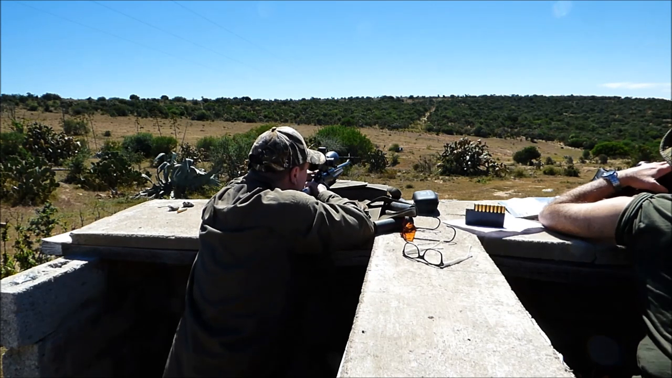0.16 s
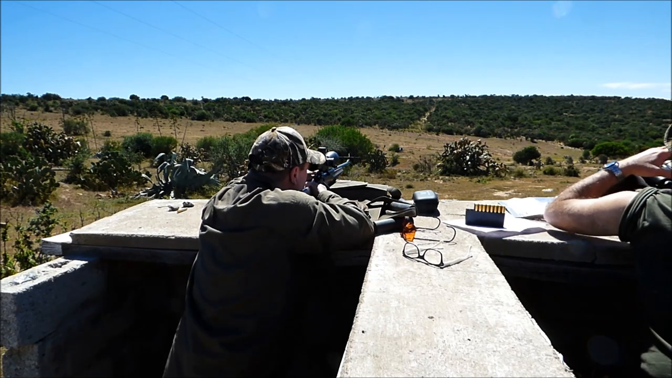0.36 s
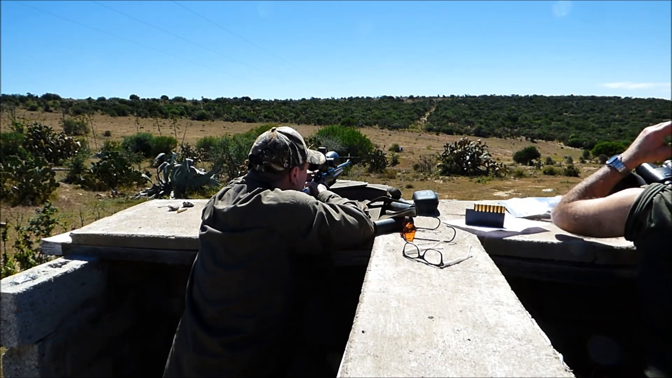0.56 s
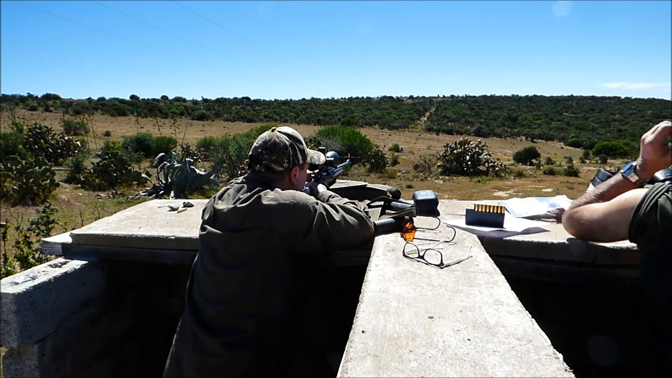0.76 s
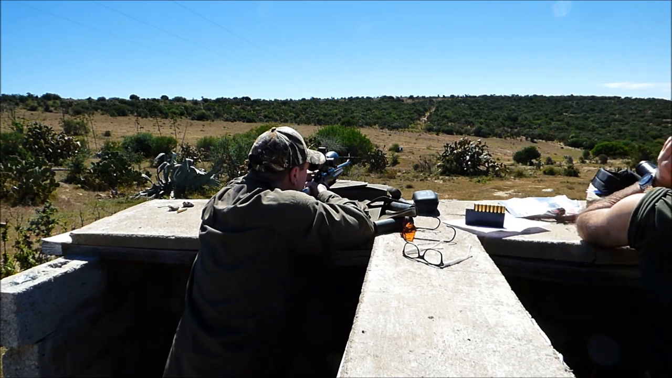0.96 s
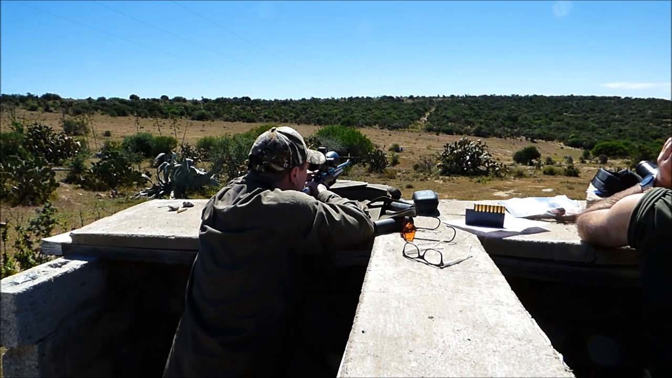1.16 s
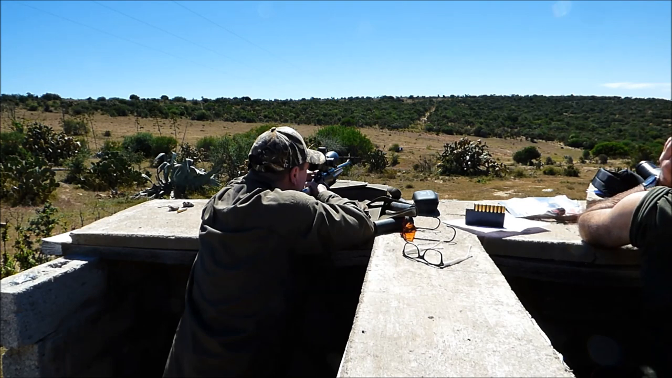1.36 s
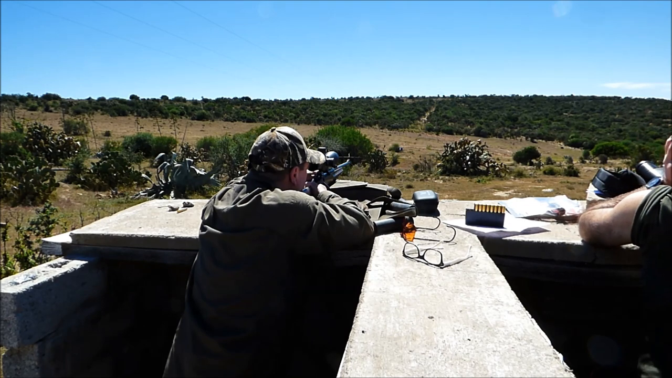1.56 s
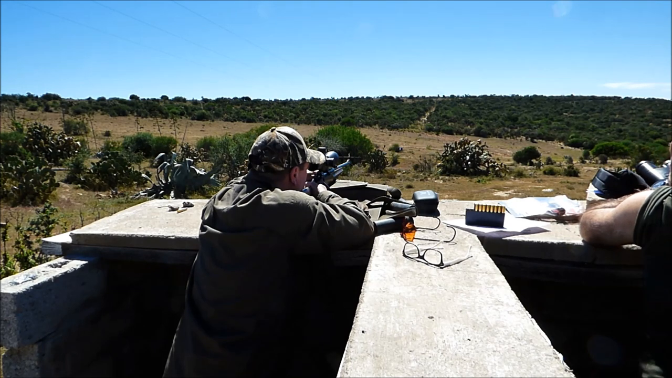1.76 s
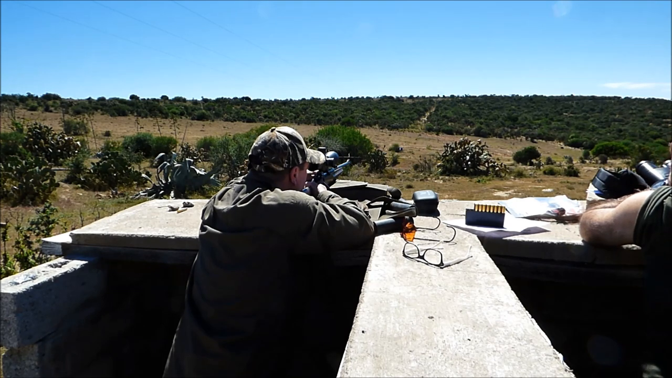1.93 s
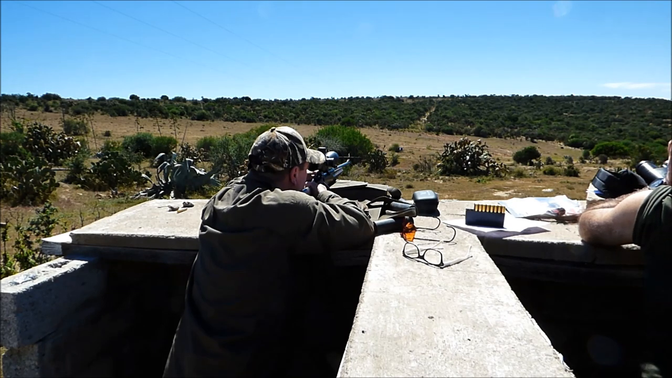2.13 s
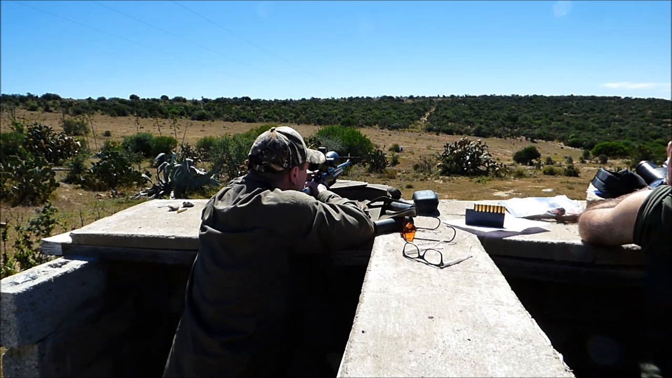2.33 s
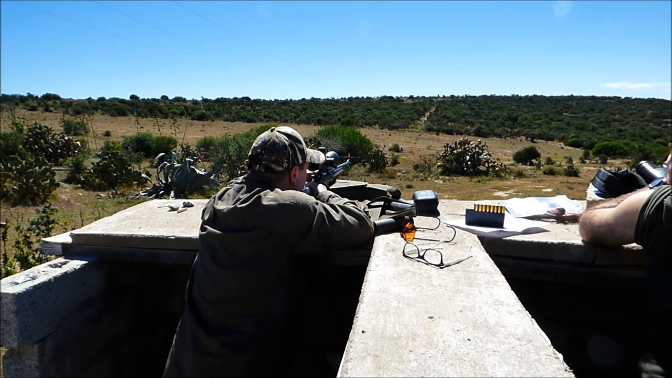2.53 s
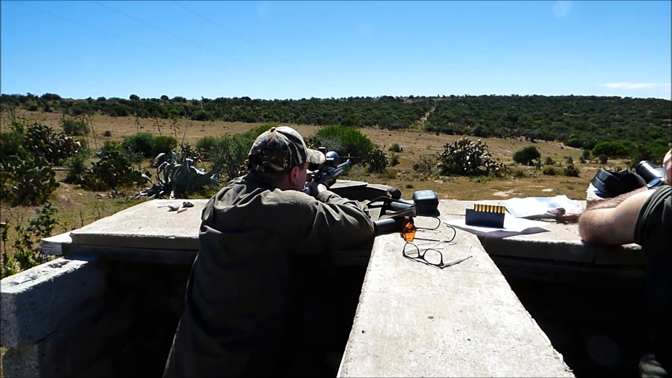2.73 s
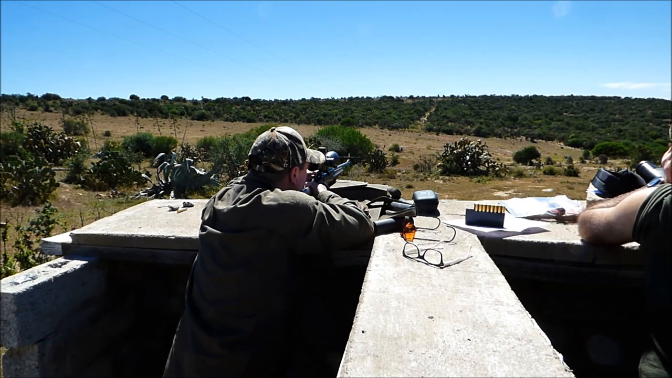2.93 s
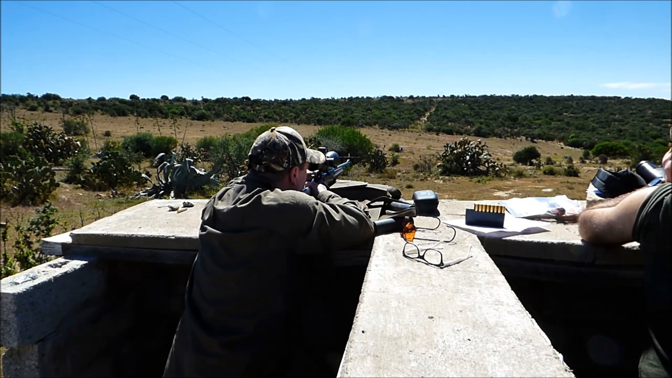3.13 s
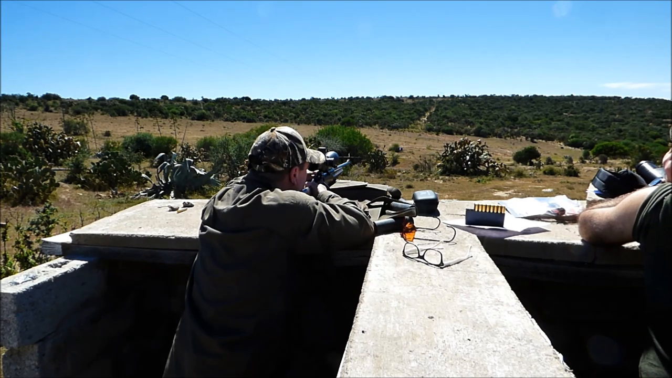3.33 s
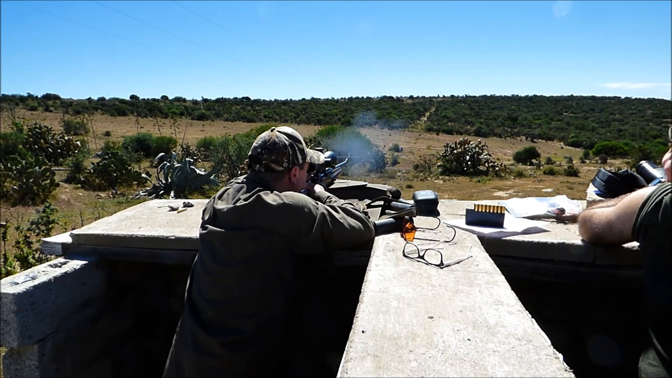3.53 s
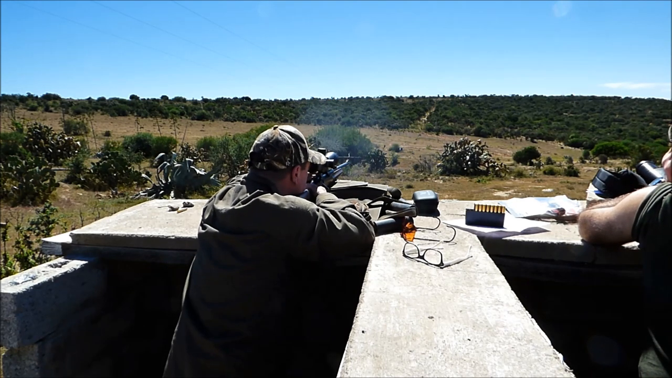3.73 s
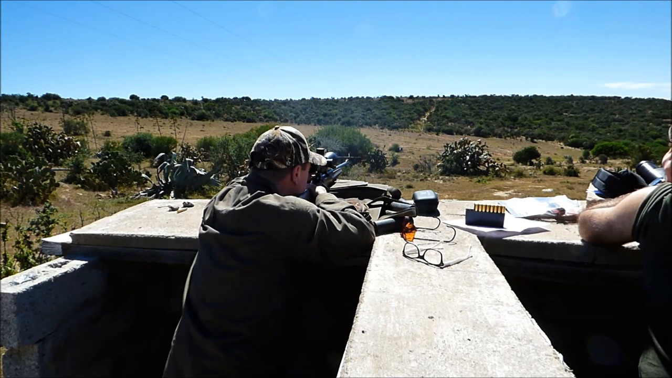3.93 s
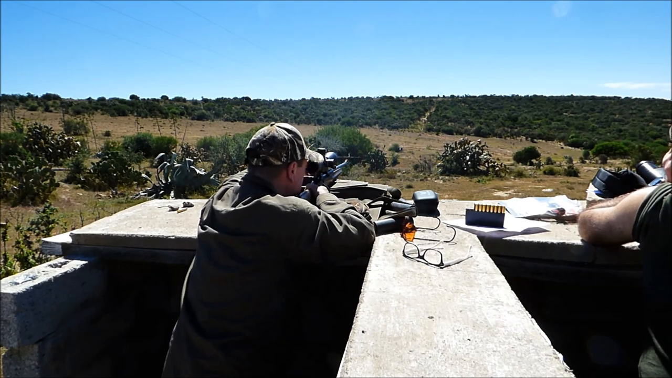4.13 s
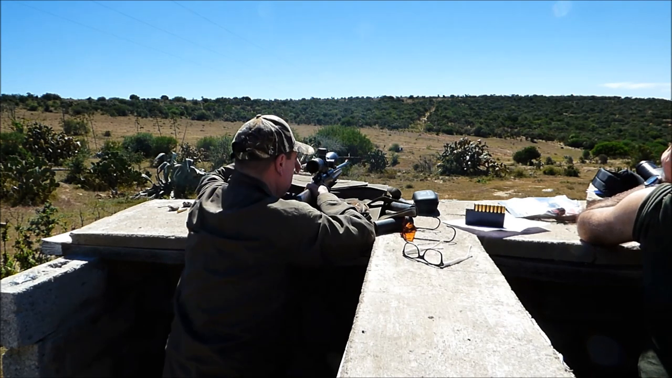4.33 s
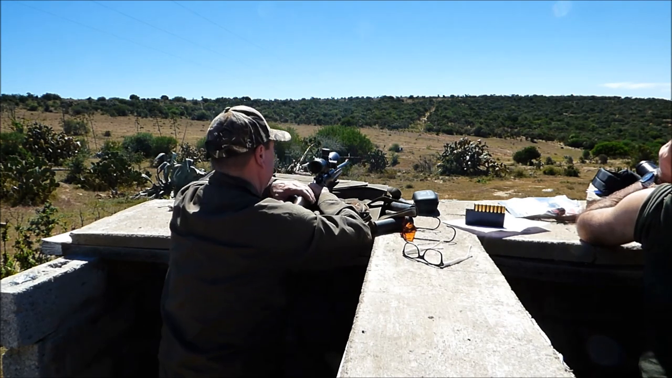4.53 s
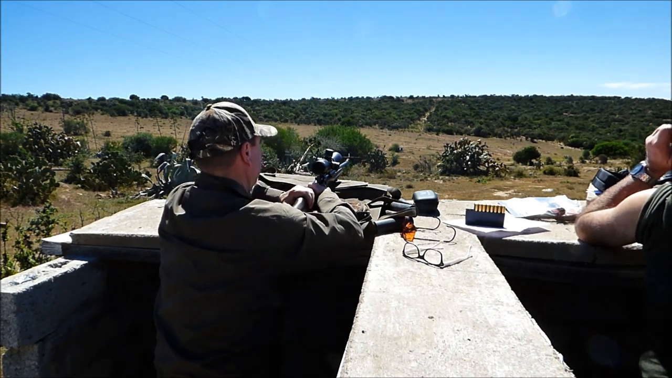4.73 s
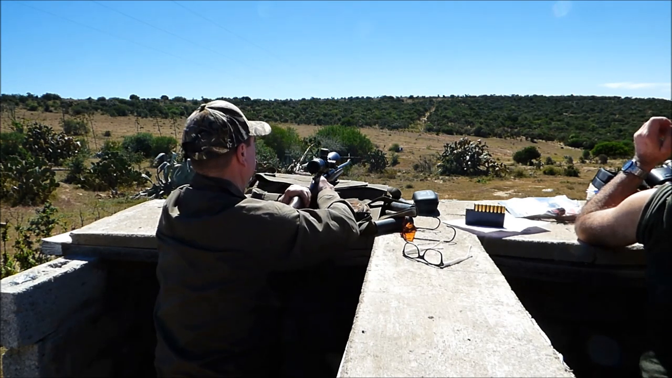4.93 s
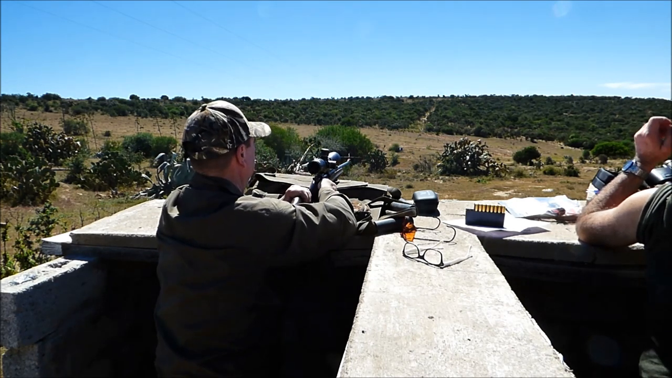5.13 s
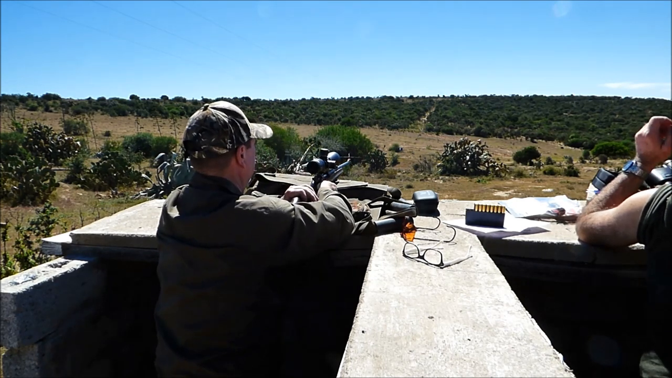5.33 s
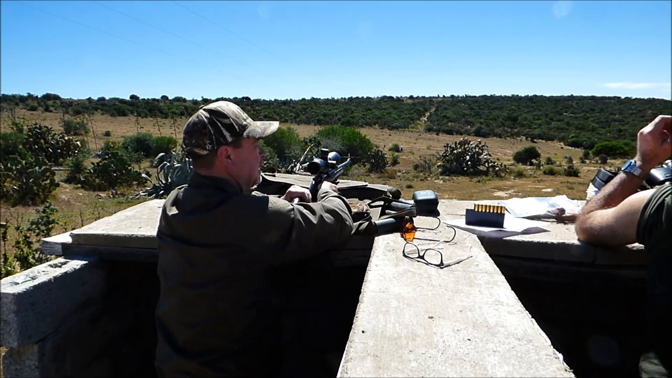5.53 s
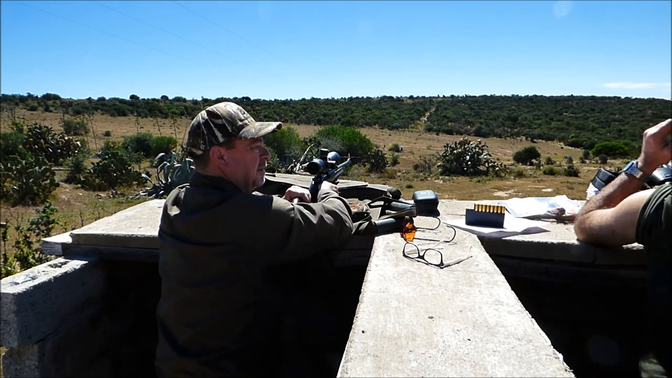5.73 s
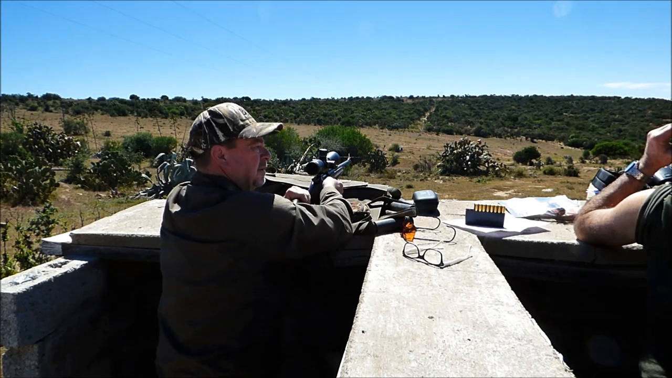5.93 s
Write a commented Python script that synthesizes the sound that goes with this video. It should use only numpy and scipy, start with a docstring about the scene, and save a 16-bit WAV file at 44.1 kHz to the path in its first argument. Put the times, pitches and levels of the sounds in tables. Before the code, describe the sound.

Quiet windy bushland with a brief bird whistle, then one overloaded rifle crack, rolling echoes, a slammed bolt and a ringing brass case.

```python
"""One rifle shot from a concrete bench on an open range, built from shaped noise that rasps and booms.
It rolls back from bush and ridge as thousands of tiny copies, with distinct slaps and a late hollow ring.
The bolt is lifted and slammed open: damped steel modes and a sliding hiss; the brass case flies out ringing
like a small bell and bounces. Around it lie noise-made wind, still air, brushes, grass hiss, a faint putter
and a grasshopper's pulsed rasp, with a bird's sine whistles and twitter and a distant bird's peeps."""
import sys
import numpy as np
from scipy import signal
from scipy.fft import rfft, irfft
from scipy.io import wavfile
from scipy.ndimage import map_coordinates

SR = 44100
rng = np.random.default_rng(int(sys.argv[2]) if len(sys.argv) > 2 else 0)


def waveform_to_disk(signal):
    """Save audio, clipped to [-1, 1], as 16-bit WAV at the path in sys.argv[1]."""
    frames = np.transpose(np.atleast_2d(signal))
    scaled = np.clip(frames, -1, 1) * 32767
    samples = np.round(scaled).astype(np.int16)
    wavfile.write(sys.argv[1], SR, samples)


N = 268595
T = np.arange(N) / SR  # seconds
FREQS = np.fft.rfftfreq(N, 1 / SR) + 1e-3  # Hz, kept above zero for the logarithm

# Colour of the still air. Each row: frequency in Hz, level in dB per Hz.
AIR_COLOUR = [(25, -8), (60, 2.5), (150, -4.5), (350, -4), (520, -3.5), (800, -5.5), (1500, -10),
              (2500, -16), (5000, -18.5), (9000, -25.5), (15500, -43)]
# Colour of the distant putter. Each row: frequency in Hz, level in dB per Hz.
PUTTER_COLOUR = [(250, -27.5), (430, -10.5), (520, 5.5), (620, -3.5), (800, -17.5), (1250, -5.5),
                 (1450, -15), (1650, -9.5), (1950, -18.5), (3200, -20.5), (6000, -36.5)]
# The strongest gusts bump the microphone. Each row: centre in seconds, level in dB, length in seconds.
GUST_BUMPS = [(.78, -57.5, 0.028), (1.759, -49.5, 0.011), (1.95, -62, .02), (2.05, -59, 0.027),
              (2.15, -58, 0.019), (2.32, -57, 0.025), (2.51, -60, 0.037), (3.01, -45, 0.029),
              (3.53, -47, 0.019), (5.12, -49, 0.048), (5.25, -53, 0.03), (5.67, -46, 0.015),
              (5.79, -52.5, 0.024), (5.89, -55, 0.012)]
# Colour of gusts and breeze. Each row: frequency in Hz, level in dB.
WIND_COLOUR = [(25, -15), (60, -3.5), (100, 1.5), (160, -4), (240, -13.5), (400, -37), (1000, -83.5)]
# Sleeves and hands brush the gear. Each row: centre in seconds, level in dB, length in seconds.
GEAR_BRUSHES = [(.04, -66.5, 0.012), (.234, -64, 0.0028), (.25, -60, 0.0022), (.38, -69, .02),
                (2.177, -57.5, 0.00071), (3.318, -64.5, 0.0024), (3.55, -66.5, 0.0124), (5.56, -63, 0.0016),
                (6.007, -51, 0.0015), (6.0135, -38, 0.001), (6.01, -57.5, 0.015)]
# Colour of the brushes. Each row: frequency in Hz, level in dB.
GEAR_BRUSH_COLOUR = [(400, -1), (1200, 4), (2800, -0.5), (4300, 6), (6000, -3.5), (8500, 0.5), (13000, -13),
                     (16000, -17)]
# Faint peeps of a distant bird. Each row: centre in seconds, level in dB, length in seconds.
DISTANT_PEEPS = [(2.8, -81, 0.046), (3.03, -81, .05), (3.325, -79, .015)]
# Thin hiss from the grass. Each row: time in seconds, level in dB.
GRASS_HISS = [(0.05, -70.5), (0.4, -69), (0.75, -76.5), (1.7, -70.5), (2.5, -76), (3.4, -74), (5.9, -72)]
# A grasshopper's bursts. Each row: centre in seconds, level in dB, length in seconds.
GRASSHOPPER_BURSTS = [(.23, -70, 0.22), (3.35, -73, .21)]
# Bursts of a small bird's twitter. Each row: centre in seconds, level in dB before a trim, length in seconds.
TWITTER_BURSTS = [(.535, -65, 0.011), (.61, -65, 0.033)]
# Whistles that slide up and hold the top; the first and third slide down again, the second stops on its
# top note. Each row: start in seconds, length in seconds, hold in seconds, level in dB.
BIRD_WHISTLES = [(.77, .088, 0.0023, -58), (0.858, 0.087, .06, -58), (6.03, .085, 0.0048, -50)]
# Colour of the blast's front, rasp and scatter. Each row: frequency in Hz, level in dB per Hz.
RASP_COLOUR = [(600, -35.5), (1500, -14), (2400, -6.5), (3300, -14), (5400, -0.5), (7000, -3), (9600, -1.5),
               (12000, -9), (16000, -11)]
# Colour of the blast's boom. Each row: frequency in Hz, level in dB per Hz.
BOOM_COLOUR = [(30, -45), (70, -31.5), (110, -20.5), (170, -9), (230, -1), (330, 6.5), (390, -4.5),
               (490, 4.5), (620, -6), (850, -1.5), (1200, -9.5), (1600, -13), (4000, -36)]
# Centres of the echo's five overlapping bands, in Hz.
ROLL_BANDS = [170, 340, 900, 3000, 8000]
# Colour of the rolling echo within its bands. Each row: frequency in Hz, level in dB.
ECHO_COLOUR = [(30, -35), (80, -28.5), (130, -4), (185, 2), (270, 0), (330, 3), (390, -10), (470, -2),
               (1100, -1.5), (1800, 1), (2400, -2.5), (4800, -1.5), (7500, -5.5), (10500, -6.5),
               (14500, -35.5)]
# Stereo width of the rolling echo. Each row: frequency in Hz, side against mid in dB.
ECHO_WIDTH = [(60, -11), (200, -20.5), (400, -17.5), (750, -7.5), (1300, -8), (2400, -9.5), (5000, -10),
              (12000, -3.5)]
# The land's echo before band trims. Each row: time in seconds, level in dB at 500-1400 Hz,
# level in dB at 1800-4500 Hz.
LAND_ECHO = [(3.675, -43, -46.5), (3.7, -36, -33.5), (3.79, -36, -32.5), (3.92, -44, -40),
             (3.99, -36.5, -32), (4.11, -45, -31), (4.26, -44, -37), (4.41, -44, -36), (4.58, -38.5, -36.5),
             (4.78, -37.5, -40), (4.96, -46.5, -51.5), (5.13, -44.5, -52), (5.25, -52, -55.5),
             (5.5, -55.5, -61.5), (5.85, -63, -69.5)]
# A rounded low echo off the slope, before trims. Each row: centre in seconds, level in dB, length in seconds.
SLOPE_BOOMS = [(4.39, -50, 0.027)]
# Distinct echoes off banks and bush clumps. Each row: centre in seconds, level in dB, length in seconds.
BANK_SLAPS = [(3.714, -46, 0.0022), (3.786, -30, 0.0038), (3.9845, -21, 0.00079), (4.061, -28, 0.00065),
              (4.089, -26.5, 0.0053), (4.168, -23, 0.00048), (4.74, -35, 0.00085)]
# Colour of those slaps. Each row: frequency in Hz, level in dB.
BANK_SLAP_COLOUR = [(100, -13), (250, -17), (1500, -5), (3000, -1.5), (6000, -15.5), (9000, -7.5),
                    (14000, -68)]
# Knocks of the rifle's action. Each row: start in seconds, level in dB,
# hardness in dB per decade about 1 kHz, ring stretch as a factor.
ACTION_KNOCKS = [(4.2026, -17.5, 15, 1.73), (4.4728, -37, 0, 0.61), (4.483, 1, -3, 1.33),
                 (4.528, -22.5, -6, 1.8), (4.893, -24, -25, 1.15), (5.129, -24.5, -19, 1.7),
                 (5.296, -30.5, -20, 1.2), (5.359, -17.5, -23, 0.45), (5.3685, -32, -7, 1.5),
                 (5.395, -28, -15, 0.83)]
# Modes of the action before each knock's stretch. Each row: frequency in Hz, level in dB, t60 in seconds.
ACTION_MODES = [(227, -27, 0.038), (643, -27, 0.0162), (920, -17.5, 0.0057), (1120, -0.5, 0.0057),
                (2170, -10.5, 0.0066), (3280, -12.5, 0.018), (4560, -2.5, 0.0022), (8470, -4, 0.0015)]
# Strokes of the bolt, steel sliding on steel. Each row: fastest moment in seconds, level in dB,
# rise t60 in seconds, fall t60 in seconds.
BOLT_STROKES = [(4.488, -18, 0.14, 0.14), (5.14, -60, 0.94, 1.8)]
# Colour of the sliding steel. Each row: frequency in Hz, level in dB.
BOLT_SLIDE_COLOUR = [(200, -8), (850, 0), (1600, 3.5), (2500, 3), (6000, 3), (9000, -3), (13000, -27.5),
                     (16000, -26)]
# Strikes on the brass case. Each row: start in seconds, level in dB, brightness in dB per octave,
# ring stretch as a factor.
CASE_STRIKES = [(4.4845, -23, 11.5, 0.17), (4.4932, -19, -5.5, 0.89), (4.816, -47, -31, 0.38),
                (4.9044, -36.5, 6, 1.0), (4.919, -46.5, 1, 0.46), (5.075, -49.5, -8, 0.46),
                (5.2204, -51.5, -6, 0.65), (5.31, -52, 1, .3), (5.4486, -45.5, -4, 0.35),
                (5.6847, -64, -2, 0.22), (5.8536, -65.5, -7, 0.62), (5.9794, -64, -4, 0.26)]
# Modes of the case before pitch rise and stretch. Each row: frequency in Hz, level in dB, t60 in seconds.
CASE_MODES = [(3270, -14, .3), (3365, -19, .35), (4920, -23, .2), (5225, -15, .2), (5353, 0, .9),
              (5677, -1, .3), (6530, -24, .2), (7045, -15, .45), (7450, -19, .2), (7735, -15, .28),
              (8387, -17, .15), (8600, -24, .3), (9115, -15, .36), (10040, -27, .25), (10725, -24, .42),
              (11020, -29, .2), (11650, -38, .35), (12225, -40, .5)]
# Hollow returns of the late echo. Each row: start in seconds, level in dB, rise in seconds, hold in seconds.
HOLLOW_RETURNS = [(4.498, -43, .42, 0.18), (5.42, -55.5, 0.067, .08)]

WHISTLE_LOW_HZ, WHISTLE_HIGH_HZ, SLIDE_S = 2330, 4080, .042
SHOT_S = 3.6276  # the blast reaches the microphone
# air dulls the travelling echo, and soft ground takes its upper bass
AIR_LOSS_DB_PER_S, BASS_LOSS_DB_PER_S, GROUND_LOSS_DB_PER_S = 21, 2, 1.5
# the case tumbles from the ejector to its landing and passes the microphone on the way
EJECT_S, PASS_S, LANDING_S, TUMBLE_HZ = 4.492, 4.87, 4.904, 12.94
PITCH_RISE_PER_S = .012  # fraction by which the cooling case sharpens per second, until it lands
TOP_HZ = 15900


def undb(db):
    """Decibels to gain."""
    return 10 ** (np.asarray(db) / 20)


def unit(x):
    """Scale to rms 1."""
    return x / np.sqrt(np.mean(x ** 2))


def colour(points):
    """Gain over frequency from (Hz, dB) points."""
    hz, db = np.transpose(points)
    return undb(np.interp(np.log(FREQS), np.log(hz), db))


def resonance(hz, width_hz):
    """Gain over frequency of a single resonant peak."""
    return 1 / (1 + ((FREQS - hz) / width_hz) ** 2)


def pair(mid, side):
    """Left and right from mid and side."""
    return np.array([mid + side, mid - side])


def noise(shape, side_db):
    """Stereo noise of rms 1 with the given spectrum."""
    mid, side = irfft(rfft(rng.standard_normal((2, N))) * shape, N)
    return unit(pair(mid, undb(side_db) * side))


def walk(rate):
    """Slow random drift through `rate` fresh values per second, drawn with a spread of 1."""
    return np.interp(T * rate, np.arange(2000), rng.standard_normal(2000))


def envelope(start, attack, hold, t60):
    """Gain over time: a straight rise, a hold and an exponential release."""
    t = T - start
    release = np.exp(-np.log(1000) * np.maximum(t - attack - hold, 0) / t60)
    return np.clip(t / attack, 0, 1) * release


def swells(rows):
    """Sum of bell-shaped swells from (s, dB, length s) rows."""
    return sum(undb(db) * np.exp(-.5 * ((T - s) / length) ** 2) for s, db, length in rows)


def curve(rows, axis=1):
    """Gain over time from a column of dB."""
    rows = np.array(rows)
    return undb(np.interp(T, rows[:, 0], rows[:, axis]))


def add(track, start, sound):
    """Mix a sound into a track at a given time."""
    track[..., int(start * SR):][..., :sound.shape[-1]] += sound


def ring(start, hz, gain, t60, contact=.00005):
    """Damped modes set going by one contact (in seconds); one row for each mode."""
    t = np.maximum(T[int(start * SR):][:SR] - start, 0)
    push = 1 - np.exp(-t / contact)
    decay = np.exp(-np.log(1000) * t / t60[:, None])
    return gain[:, None] * push * np.sin(2 * np.pi * hz[:, None] * t) * decay


def shelter(x, wet_db, t60):
    """Surroundings add a short decaying scatter, different in each channel."""
    t = T[:SR // 4]
    tail = rng.standard_normal((2, len(t))) * np.exp(-np.log(1000) * t / t60)
    tail /= np.sqrt(np.sum(tail ** 2, axis=1, keepdims=True))
    return x + undb(wet_db) * signal.fftconvolve(x[None], tail, axes=1)[:, :N]


def background(putter_hz=6.2, breeze_db=-70):
    """Shaped noise makes still air, a limping putter, gusts and breeze, gear brushes and a distant bird."""
    turn = 2 * np.pi * putter_hz * T + 0.57 * walk(5.6)
    # two uneven beats a turn
    beats = unit(np.exp(1.15 * np.cos(2 * turn + .5 * np.sin(turn + 1)) + .2 * walk(13)))
    putter = undb(-68.5) * beats * noise(colour(PUTTER_COLOUR), side_db=0)
    air = undb(-66) * noise(colour(AIR_COLOUR), side_db=-0.5)
    # the breeze sets in at 1.65 s and keeps wavering
    breeze = undb(breeze_db + 4 * walk(21)) * np.clip((T - 1.65) / 0.086, 0, 1)
    wind = (swells(GUST_BUMPS) + breeze) * noise(colour(WIND_COLOUR), side_db=-5.5)
    brushes = swells(GEAR_BRUSHES) * noise(colour(GEAR_BRUSH_COLOUR), side_db=-11)
    peep_level = swells(DISTANT_PEEPS) * undb(2.5 * walk(25.5))
    peeps = peep_level * noise(resonance(hz=2830, width_hz=300), side_db=-2)
    return air + putter + wind + brushes + peeps


def grasshopper(strokes_hz=29):
    """Leg strokes make a pulsing rasp high in the treble, over the hiss of the grass."""
    strokes = unit(np.exp(1.3 * np.cos(2 * np.pi * strokes_hz * T + .8 * walk(8.9)) + .25 * walk(33)))
    wing = resonance(hz=8800, width_hz=700)
    rasp = noise(wing, side_db=-7.5) * strokes * swells(GRASSHOPPER_BURSTS)
    grass = noise(resonance(hz=8930, width_hz=3000), side_db=-2.5) * curve(GRASS_HISS)
    return rasp + grass


def bird(trill_hz=75, edge_s=0.021, echo_db=-76.5):
    """A quiet falling twitter, then sliding sine whistles; a top note lingers in the bush as narrow noise."""
    song = 0
    for s, length, hold, db in BIRD_WHISTLES:
        height = np.clip(np.minimum(T - s, s + 2 * SLIDE_S + hold - T) / SLIDE_S, 0, 1)
        pitch = WHISTLE_LOW_HZ + (WHISTLE_HIGH_HZ - WHISTLE_LOW_HZ) * np.sin(np.pi / 2 * height) ** 2
        gate = np.clip(np.minimum(T - s, s + length - T) / edge_s, 0, 1)
        song = song + undb(db) * gate * np.sin(2 * np.pi * np.cumsum(pitch + 25 * walk(300)) / SR)
    # each chirp falls in pitch, over and over
    chirp_hz = 5000 - 1600 * ((T * trill_hz + 0.6 * walk(19)) % 1) + 300 * walk(590)
    twitter = undb(-2.0) * np.sin(2 * np.pi * np.cumsum(chirp_hz) / SR) * swells(TWITTER_BURSTS)
    first_whistle_s = BIRD_WHISTLES[0][0]
    lingering = undb(echo_db + 2 * walk(15)) * envelope(first_whistle_s, attack=0.052, hold=.12, t60=4.2)
    echo = lingering * noise(resonance(hz=3980, width_hz=85), side_db=-7.5)
    return shelter(song, wet_db=-3.5, t60=0.33) + shelter(twitter, wet_db=-1, t60=.15) + echo


def blast(front_db=-21, rasp_db=-5, scatter_db=-29, boom_db=-15, after_db=-29):
    """A sharp front, the brief rasp of the overloaded microphone, a low boom and scatter round the bench."""
    front = undb(front_db) * envelope(SHOT_S, attack=0.00036, hold=.004, t60=.02)
    rasp = undb(rasp_db) * envelope(SHOT_S + 0.0031, attack=0.0042, hold=.0026, t60=0.015)
    scatter = undb(scatter_db) * envelope(SHOT_S, attack=.01, hold=.016, t60=.075)
    boom = undb(boom_db) * envelope(SHOT_S + .002, attack=.003, hold=0.013, t60=0.012)
    after = undb(after_db) * envelope(SHOT_S, attack=0.012, hold=0.021, t60=.07)
    bright = (front + rasp + scatter) * noise(colour(RASP_COLOUR), side_db=-11.5)
    low = (boom + after) * noise(colour(BOOM_COLOUR), side_db=-3.5)
    return bright + low


def roll(spread_db=2.0, echoes_per_s=4000, flutter_db=2.5, rumble_db=-35.5, upper_bass_db=-.5,
         near_s=0.18, body_db=3, crack_db=1.0, sizzle_db=2):
    """Thousands of bushes return tiny copies; bass falls with distance and air takes treble from far ones."""
    arrivals = rng.random(N) < echoes_per_s / SR
    sizes = undb(spread_db * np.minimum(rng.exponential(size=N), 4)) * arrivals
    bearing = rng.standard_normal(N)
    echoes = sizes * rng.choice([-1, 1], N) * undb(flutter_db * walk(90))
    # every echo arrives again off the bench top and the wall, which ribs its spectrum
    bench_top = 0.12 * np.exp(-2j * np.pi * FREQS * .0032)
    wall = 0.05 * np.exp(-2j * np.pi * FREQS * .0094)
    sides = rfft(echoes * bearing) * colour(ECHO_WIDTH)
    spectra = pair(rfft(echoes), sides) * colour(ECHO_COLOUR) * (1 + bench_top + wall)

    travel = np.maximum(T - SHOT_S, 0)  # seconds since the blast
    spreading = near_s / np.maximum(travel, near_s)
    rumble = undb(rumble_db - BASS_LOSS_DB_PER_S * travel) * spreading + swells(SLOPE_BOOMS)
    upper_bass = rumble * undb(upper_bass_db - GROUND_LOSS_DB_PER_S * travel)
    body = undb(body_db) * curve(LAND_ECHO)
    crack = undb(crack_db) * curve(LAND_ECHO, axis=2)
    sizzle = crack * undb(sizzle_db - AIR_LOSS_DB_PER_S * travel)

    out = 0
    for share, gain in zip(np.eye(len(ROLL_BANDS)), (rumble, upper_bass, body, crack, sizzle)):
        band = np.interp(np.log(FREQS), np.log(ROLL_BANDS), share)
        out = out + unit(irfft(spectra * band, N)) * gain
    onset = np.clip(travel / 0.029, 0, 1) ** 2
    slaps = swells(BANK_SLAPS) * noise(colour(BANK_SLAP_COLOUR), side_db=-8.5)
    return undb(-2.5) * out * onset + slaps


def bolt(low_cut_hz=170, grate_db=4.5):
    """The bolt is lifted, drawn back to its stop and run home; harder contact rings the higher modes."""
    hz, db, t60 = np.transpose(ACTION_MODES)
    decades = np.log10(hz / 1000)
    knocks = np.zeros(N)
    for s, hit_db, hard_db, stretch in ACTION_KNOCKS:
        add(knocks, s, ring(s, hz, undb(hit_db + db + hard_db * decades), t60 * stretch).sum(0))
    # the knocks carry little bass
    knocks = signal.sosfilt(signal.butter(2, low_cut_hz, "high", fs=SR, output="sos"), knocks)
    speed = 0
    for s, peak_db, rise, fall in BOLT_STROKES:
        away = np.maximum((s - T) / rise, (T - s) / fall)
        speed = speed + undb(peak_db) * np.exp(-np.log(1000) * away)
    slide = speed * undb(grate_db * walk(400)) * noise(colour(BOLT_SLIDE_COLOUR), side_db=-10.5)
    return shelter(knocks, wet_db=-12.0, t60=0.03) + slide


def case(flight_depth=0.61, wobble_depth=0.3, wobble_hz=11, pass_db=6):
    """The empty case rings like a small bell at each strike; tumbling sways its level and each mode wobbles."""
    hz, db, t60 = np.transpose(CASE_MODES)
    octaves = np.log2(hz / hz[np.argmax(db)])  # from the strongest mode
    modes = np.zeros((len(hz), N))
    for s, hit_db, bright_db, stretch in CASE_STRIKES:
        pitch = 1 + PITCH_RISE_PER_S * (min(s, LANDING_S) - EJECT_S)
        gain = undb(hit_db + db + bright_db * octaves)
        add(modes, s, ring(s, hz * pitch, gain, t60 * stretch, contact=0.00036))
    rings = 0
    for mode in modes:
        rings = rings + mode * (1 + wobble_depth * np.sin(2 * np.pi * wobble_hz * T + 2.4 * walk(13)))
    tumble = np.cos(2 * np.pi * TUMBLE_HZ * (T - EJECT_S) + 0.43 * walk(9))
    airborne = np.clip((LANDING_S - T) / .02, 0, 1)
    passing = undb(pass_db * np.exp(-.5 * ((T - PASS_S) / 0.021) ** 2))
    rings = rings * passing * (1 + flight_depth * tumble * airborne)
    # the swinging path to the microphone smears each line a little
    rings = map_coordinates(rings, [(T + .00002 * walk(25)) * SR], order=3)
    return shelter(rings, wet_db=-14.0, t60=0.057)


def hollow(hum_db=-52):
    """A hollow ring of narrow noise swells twice in the late echo; a broader hum below it lingers."""
    swell = sum(undb(db) * envelope(s, rise, hold, t60=1.0) for s, db, rise, hold in HOLLOW_RETURNS)
    ringing = swell * noise(resonance(hz=860, width_hz=26), side_db=-15.5)
    hum_level = undb(hum_db) * envelope(4.57, attack=0.33, hold=0.62, t60=2.0)
    return ringing + hum_level * noise(resonance(hz=700, width_hz=130), side_db=-22)


def scene(lean_db=0.4753):
    """The shot, its echo, the reload and the open country; the shooting sits a little to the right."""
    shooting = blast() + roll() + bolt() + case() + hollow()
    return shooting * undb([[-lean_db], [lean_db]]) + background() + grasshopper() + bird()


def record(dry):
    """Clip at full scale, cut the top steeply and sit slightly off zero."""
    offset = -.0025
    top_cut = signal.ellip(8, .2, 70, TOP_HZ, fs=SR, output="sos")
    return signal.sosfilt(top_cut, np.clip(dry, -1, 1)) + offset


dry = scene()
out = record(dry)
waveform_to_disk(out)
```